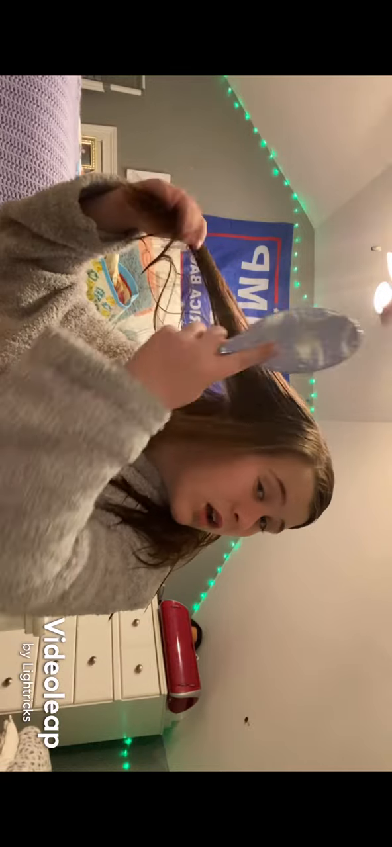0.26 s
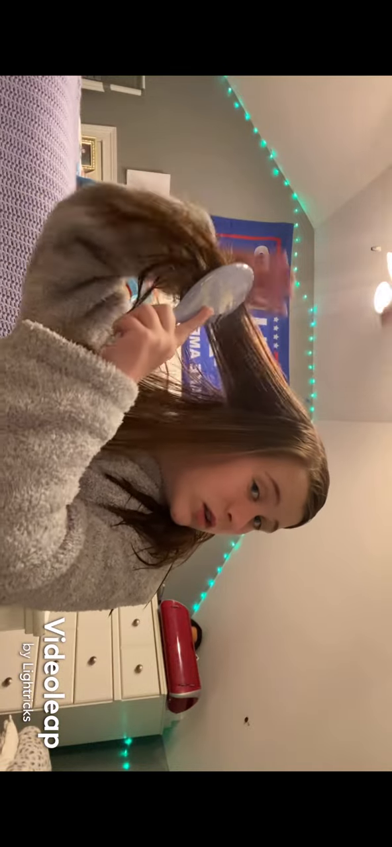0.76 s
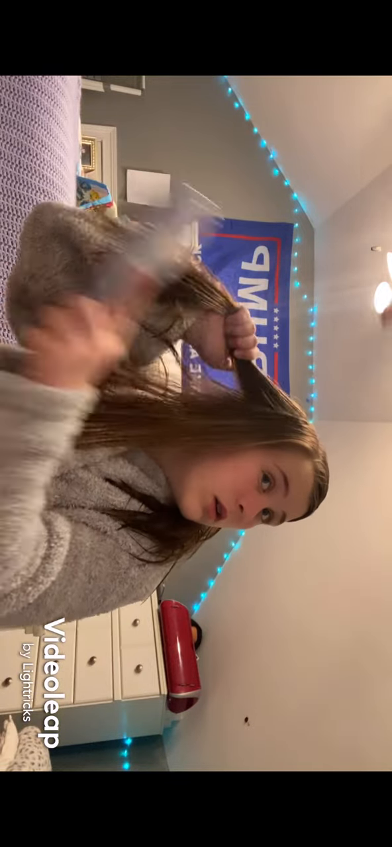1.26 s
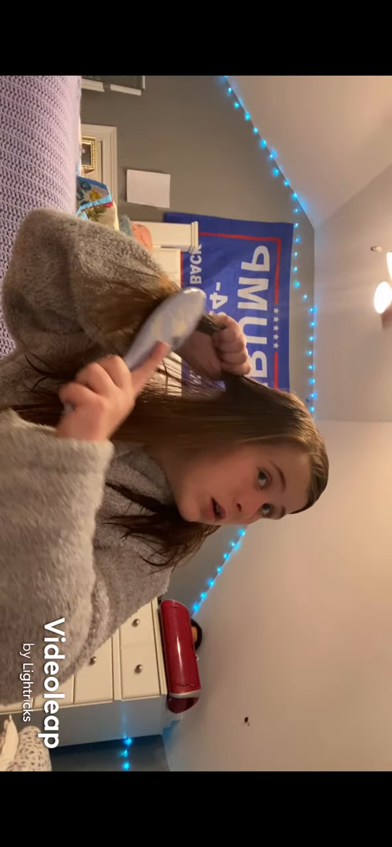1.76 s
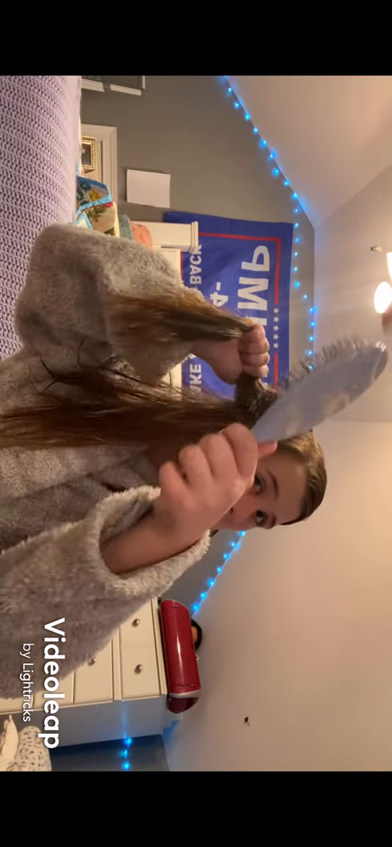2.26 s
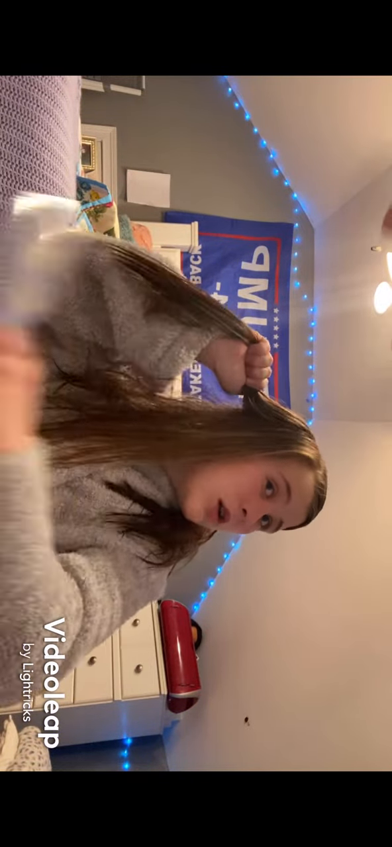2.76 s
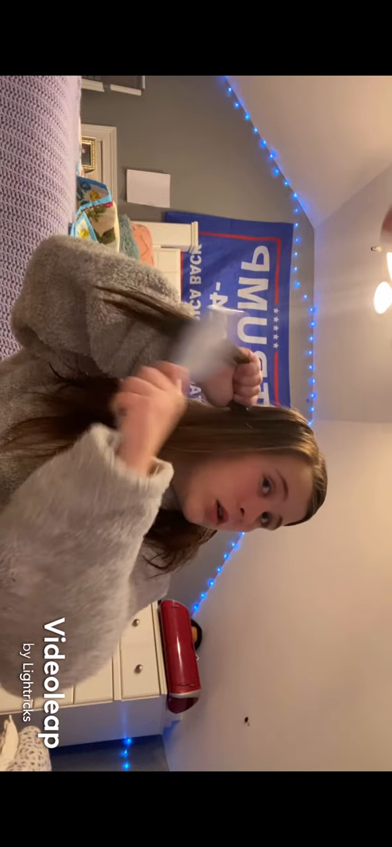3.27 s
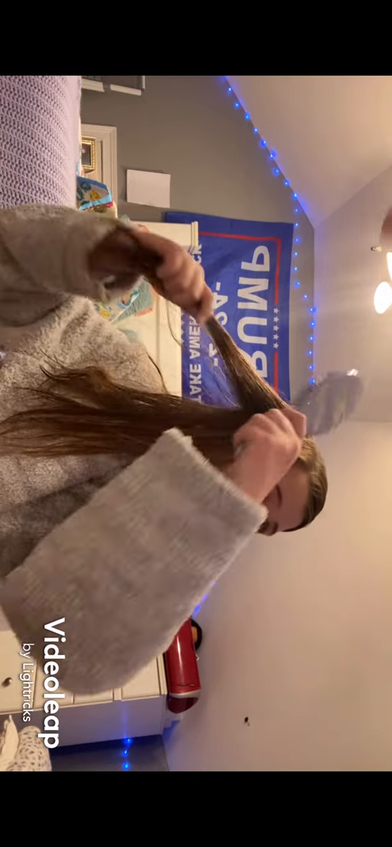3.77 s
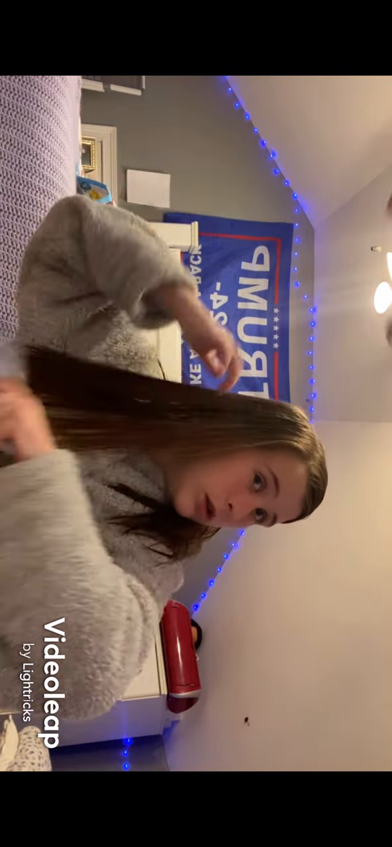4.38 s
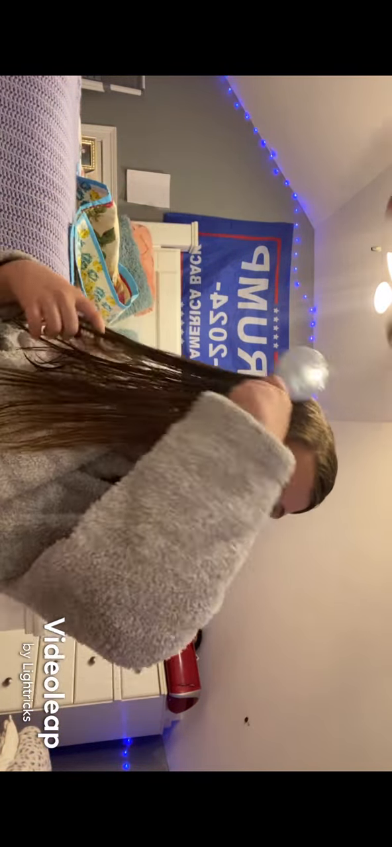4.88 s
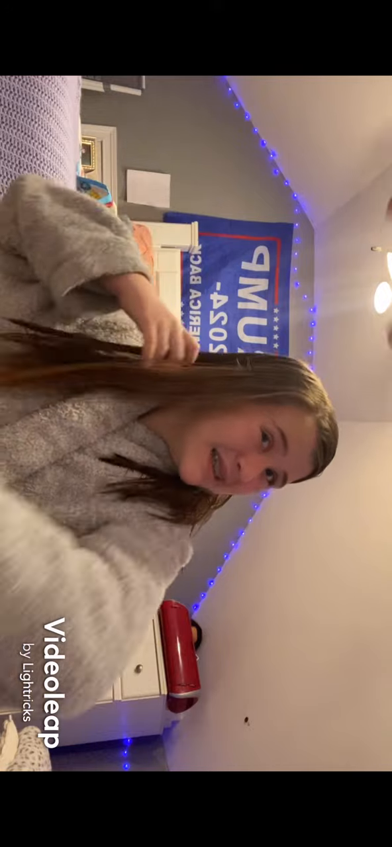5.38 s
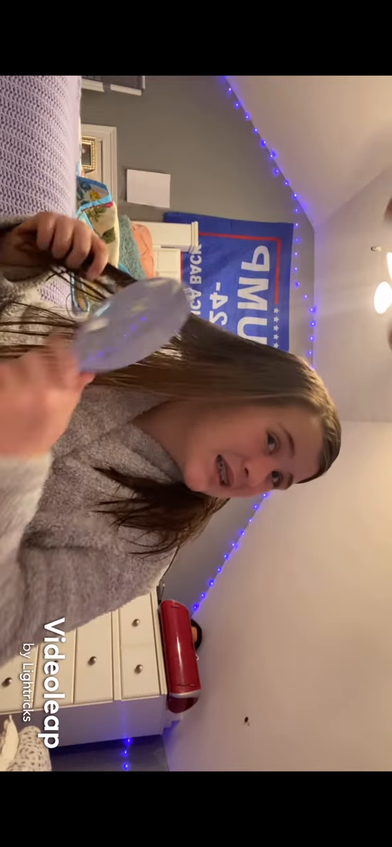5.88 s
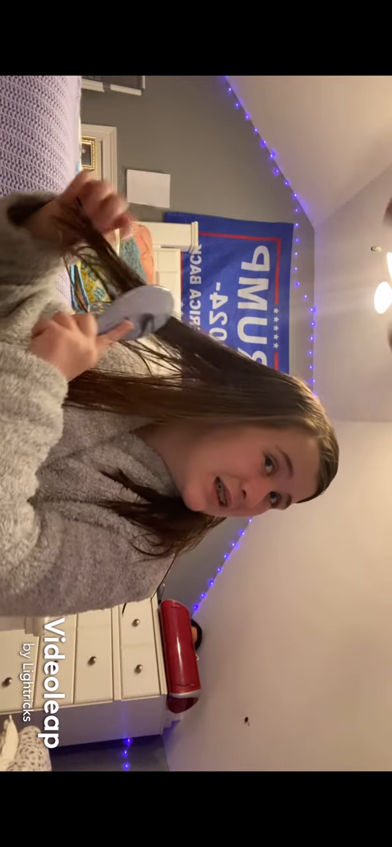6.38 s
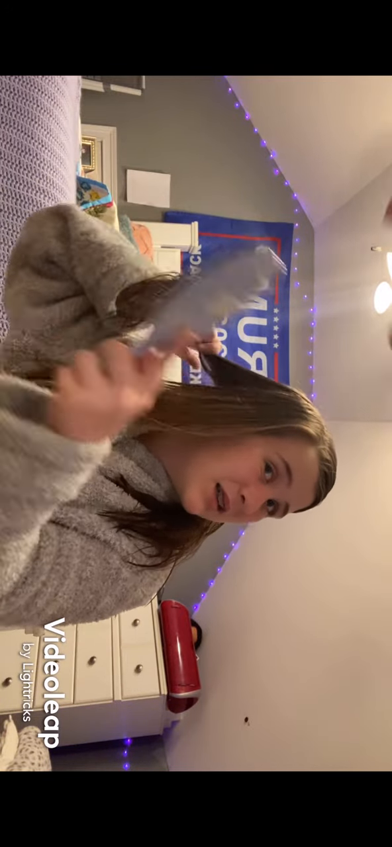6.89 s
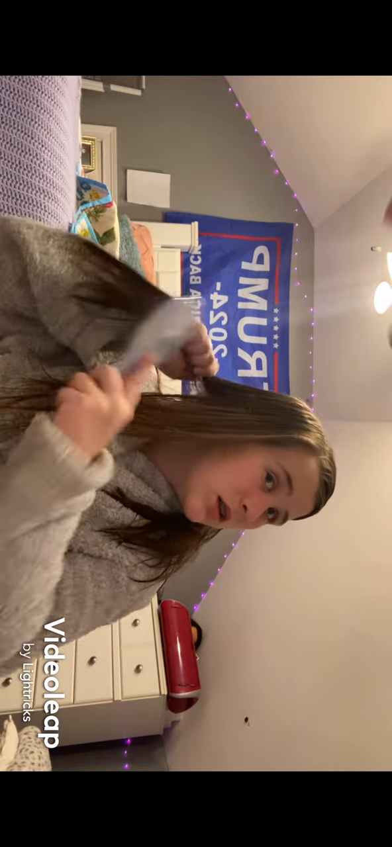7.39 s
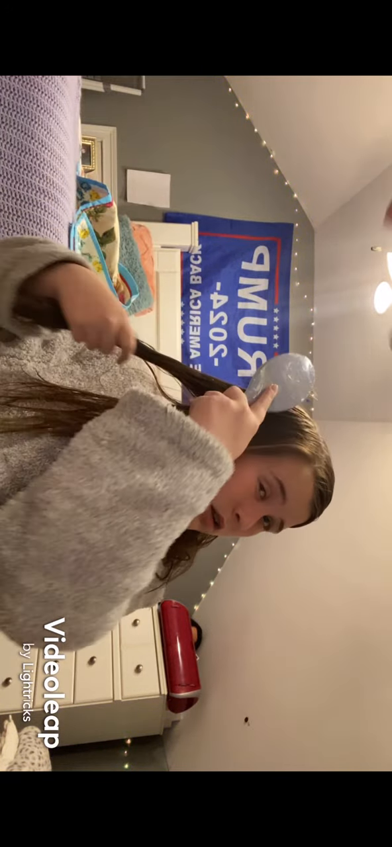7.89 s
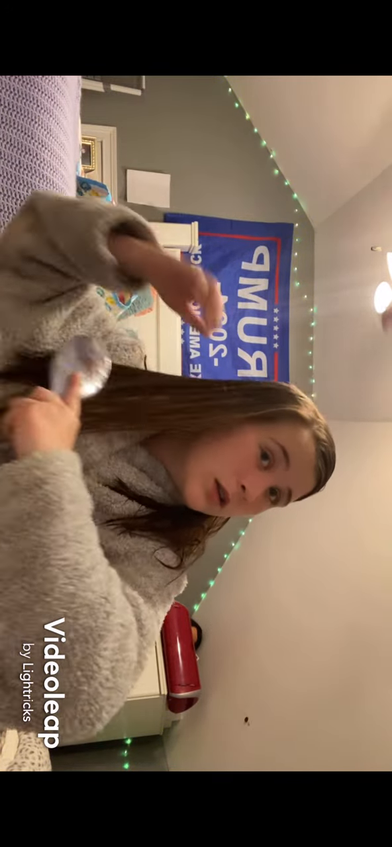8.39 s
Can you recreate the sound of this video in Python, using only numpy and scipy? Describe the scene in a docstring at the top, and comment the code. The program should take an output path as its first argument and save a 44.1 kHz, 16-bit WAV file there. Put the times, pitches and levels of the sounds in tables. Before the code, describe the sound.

Close, dry hairbrushing: brief raspy swishes, dull cushion bounces and bright little snag clicks at an irregular pace, over faint room air and rustle.

```python
"""A plastic paddle brush is pulled through long hair, close to a pair of microphone ports in a small bedroom.
Tines catch and slip in bunches, ringing the paddle and its cushion, while strands scratch and rasp past.
Soft knocks are cushion bounces that sink in pitch, with tine clatter; snags let go with pinging ticks,
and near the end a few tiny chirps squeak along a strand. Shaped noise makes the room's air and low rumble,
and tiny random creases make a faint rustle; dense, quickly dying echoes place the brush in the room."""
import sys
import numpy as np
from scipy import signal
from scipy.fft import rfft, irfft
from scipy.io import wavfile

SR = 44100
rng = np.random.default_rng(int(sys.argv[2]) if len(sys.argv) > 2 else 0)


def int16_out(signal):
    """Quantize to a 16-bit WAV file."""
    q = np.round(np.clip(np.atleast_2d(signal).T, -1, 1) * 32767)
    wavfile.write(sys.argv[1], SR, q.astype(np.int16))


N = 381024
T = np.arange(N) / SR
FREQS = np.fft.rfftfreq(N, 1 / SR)

# Levels in these tables are taken before the mix gains of their layers.
# still air of the room: (frequency [Hz], relative level [dB])
AIR_SPECTRUM = [(20, -36.5), (40, -5), (58, 7.5), (90, -9), (150, -9), (330, -19.5), (630, -29),
                (900, -25.5), (1500, -30.5), (4000, -34.5), (13500, -43), (16000, -65)]
# low rumble: (frequency [Hz], relative level [dB])
RUMBLE_SPECTRUM = [(20, -30), (42, 4), (70, 2.5), (140, -8.5), (300, -47.5)]
# swells of the rumble: (middle [s], length [s], level [dB])
RUMBLE_SWELLS = [(1.15, .25, -71), (1.43, 0.14, -58), (3.36, .3, -56.5), (4.65, 0.66, -68),
                 (5.25, 0.52, -71), (7.98, 0.57, -72.5)]
# arm movements stirring sleeve and hair: (middle [s], length [s], level [dB])
ARM_MOVES = [(0.03, 0.53, -61.5), (1.24, 0.5, -72.5), (1.68, .12, -65), (2.24, .2, -69), (2.83, 0.202, -67),
             (3.68, 0.42, -73.5), (3.98, 0.19, -61), (4.56, 0.43, -72), (5.5, 0.17, -71), (6.12, 0.49, -69),
             (6.89, 0.84, -71.5), (7.73, 0.43, -69), (8.08, 0.51, -60), (8.62, 0.23, -62)]
# hollow rustle: (frequency [Hz], relative level [dB])
RUSTLE_SPECTRUM = [(250, -12), (450, -13.5), (600, -0.5), (720, -5.5), (880, -20), (1300, -17),
                   (2000, -28.5), (13000, -45.5)]
# tines pulling through the hair: (time [s], length [s], drag on the paddle [dB], its growth from start to end [dB],
# cushion boom above drag [dB], strand scratch above drag [dB])
PULLS = [(0.344, 0.22, -66.5, 5, -9, 0.5), (0.721, .1, -67, -2, -12, -15),
         (0.872, 0.055, -62, 3, -11.5, -6.5), (0.942, 0.068, -45, 2.5, -15, -7),
         (0.983, 0.098, -40.5, 0.5, -6.5, -6), (1.319, 0.077, -52, 5, -5, -5.5),
         (1.472, 0.094, -66, 3.5, -5, -3), (1.591, 0.056, -58.5, 4, -2, -7),
         (1.734, 0.076, -44.5, -2, -7, -9), (1.869, 0.086, -55, 7.5, -6.5, -7.5),
         (1.975, 0.083, -47.5, 9, -5.5, -4.5), (2.501, 0.11, -38.5, 7, -7.5, -4.5),
         (2.911, 0.098, -36.5, 4, -5, -6.5), (3.278, 0.12, -41, -7.5, -5, -5),
         (4.047, 0.064, -55, 2.5, -9.5, -9), (4.118, 0.11, -55, 2, -9.5, -12),
         (4.22, .11, -46, 1.5, -6, -8), (4.342, 0.057, -52, -0.5, 0, -17),
         (4.426, 0.048, -48, 6.5, -3.5, -20), (4.833, 0.093, -58, 11, 0.5, -23),
         (5.049, 0.17, -51, 6, -10, -7), (5.193, 0.071, -47, -4, -7, -4),
         (5.29, 0.16, -63, -5.5, -2.5, -22), (6.295, 0.09, -57, 12.5, -9, -18),
         (6.424, 0.087, -62.5, 1, -11, -24), (6.661, 0.054, -45, 2.5, -6.5, -7.5),
         (7.027, .125, -41, 0, -5.5, -8), (7.368, 0.047, -56.5, 2.5, -2, -2.5),
         (7.402, 0.04, -41.5, 7.5, -4, -3), (7.928, 0.068, -64.5, 6.5, 9, -26),
         (8.262, 0.16, -42.5, 5, -14, -11.5), (8.395, 0.12, -44.5, 5, 0, -12)]
# brush skimming the top of the hair, swelling and fading: (middle [s], length [s], strand scratch [dB])
SKIMS = [(3.56, 0.46, -79.5), (4.05, 0.21, -61), (5.02, 0.16, -65), (6.29, 0.28, -67), (6.56, 0.43, -77),
         (7.54, 0.16, -72.5), (8.08, .24, -65), (8.23, 0.2, -68.5), (8.54, 0.094, -60)]
# ring of the paddle: (frequency [Hz], width [Hz], level [dB])
PADDLE_MODES = [(509, 130, 1), (750, 117.5, 3), (950, 310, -4.5), (1315, 224, -6.5), (1880, 170, -16),
                (2705, 330, -20.5)]
# boom of the cushion: (frequency [Hz], relative level [dB])
CUSHION_SPECTRUM = [(40, -21), (90, -12.5), (150, -3), (230, -3.5), (300, 4), (410, 5.5), (520, -1.5),
                    (800, -43.5)]
# hiss of the strands: (frequency [Hz], relative level [dB])
STRAND_SPECTRUM = [(1200, -21.5), (2100, 6.5), (3200, 2), (4300, -3), (6000, -2), (8200, 0), (10500, -8.5),
                   (13000, -1.5), (14700, -7), (16000, -32)]
# strands rubbing along loaded tines: (frequency [Hz], relative level [dB])
RASP_SPECTRUM = [(900, -9), (1500, -8.5), (1950, 8.5), (2600, -3.5), (3200, -20.5), (5000, -1.5),
                 (9000, -32.5)]
# brush landing or jerking free: (time [s], level [dB], starting cushion pitch [Hz], tine clatter above the knock [dB])
KNOCKS = [(0.725, -51, 630, 0.5), (1.066, -25.5, 1012, -15), (1.327, -30, 750, -6.5),
          (1.351, -41, 480, -22), (1.635, -39, 950, 1), (1.985, -34, 900, -3), (2.050, -40, 895, 5),
          (2.058, -41, 584, -6), (2.491, -27.5, 474, 3), (2.603, -22, 1016, -15), (2.624, -24.5, 432, -26),
          (2.902, -20, 693, -12.5), (3.013, -23, 750, -19), (3.2619, -18, 740, -2.5),
          (4.329, -27.5, 880, -10), (4.348, -28, 460, -9), (4.411, -31.5, 405, -22), (4.825, -36, 795, -29),
          (5.047, -29, 1040, -4), (5.217, -31, 700, -25), (5.261, -34.5, 450, -16), (6.363, -37, 694, -10),
          (6.473, -43.5, 700, -1.5), (7.016, -21, 955, -4.5), (7.373, -28, 820, -9),
          (7.742, -53.5, 587, -20), (7.984, -43.5, 424, -30), (8.175, -40, 750, -14),
          (8.281, -29, 785, -13.5), (8.300, -30, 660, -29), (8.452, -23, 395, -7), (8.49, -22, 500, -1)]
# many tines landing together: (frequency [Hz], relative level [dB])
CLATTER_SPECTRUM = [(500, -24.5), (1100, 16), (1550, -3.5), (2200, 7), (3800, -5), (7500, -4),
                    (13000, -6.5), (16000, -12)]
# single tines snapping off a snag: (time [s], level [dB], tine pitch [Hz], paddle tap above the tine [dB])
TICKS = [(0.886, -62, 9600, 3), (0.939, -47, 7940, 9), (0.96, -50.5, 7900, 15), (1.466, -33, 12600, -20),
         (1.508, -48.5, 12000, 2), (1.527, -48.5, 6660, 1), (1.584, -47, 12100, -1.5),
         (1.603, -43.5, 6650, 1), (1.643, -45, 6350, 5), (1.687, -53.5, 6800, 4), (1.730, -47.5, 7400, 3),
         (1.743, -47.5, 8260, 10), (1.758, -42, 6300, 6), (1.791, -38.5, 12400, -24),
         (1.889, -55.5, 7600, 7), (1.921, -43.5, 8250, 3), (2.020, -35, 8600, -6), (2.028, -32, 7950, -22),
         (2.056, -29.5, 7400, -4.5), (2.950, -26.5, 6600, 4), (2.981, -25.5, 8300, -5),
         (3.001, -30, 13200, -13), (3.377, -32, 11700, -16), (4.121, -43.5, 11900, -1.5),
         (4.163, -51, 8900, 2), (4.258, -32, 8950, 0), (4.286, -30, 14100, -14), (4.353, -42.5, 12200, -5),
         (4.461, -43, 8700, 2), (4.825, -63, 2100, 9.5), (5.096, -31, 12400, -5), (5.135, -36, 12300, -3),
         (5.412, -66.5, 2200, 15), (6.345, -45, 13300, 2), (7.062, -31.5, 7300, 4), (7.133, -34, 9700, -3),
         (7.422, -32.5, 9300, 3), (8.412, -30.5, 7800, -14)]
# crack of a freed tine: (frequency [Hz], relative level [dB])
SNAP_SPECTRUM = [(300, -26.5), (1000, -17), (1600, 10.5), (2400, 7.5), (4000, 9.5), (8500, 10.5),
                 (13500, 4), (16000, -7)]
# a tine squeaking along a taut strand: (time [s], level [dB], pitch [Hz])
SQUEAKS = [(8.4719, -22, 8360), (8.4785, -27.5, 8600), (8.4857, -37, 8500), (8.4924, -34, 8700),
           (8.5383, -34, 9200)]
# phase by which the left port leads the right: (frequency [Hz], phase [rad])
PORT_PHASE = [(30, 0), (600, .7), (1300, 1), (2300, 2.2), (5000, 3.3), (6300, 1), (8000, 0), (9200, -.9),
              (10500, -3.1), (12000, -5.7), (13700, -6.7), (15200, -9)]
# direct sound, left minus right: (frequency [Hz], level [dB])
PORT_BALANCE = [(150, 1), (350, 0.5), (700, 3.5), (2300, 1), (4400, 4.5), (8000, 0)]
# colour of the reflections, before the wet level: (frequency [Hz], level [dB])
WALLS = [(100, -16), (350, -2.5), (800, 5.5), (2000, 2), (4500, 6), (8000, -2), (14000, -12)]

# a pull grips quickly and is strongest midway; when it ends most of the drag drops and loose hair trails off
GRIP_S, ARCH_DB, SCRATCH_ARCH_DB = 0.015, 2.5, 2.5
DROP_S, TRAIL_DB, TRAIL_S, SCRATCH_TRAIL_S = 0.012, -7, 0.039, 0.033
SKIM_DRAG_DB, SKIM_BOOM_DB = -3, -6  # against the scratch
# the further a knock exceeds the load already on the cushion, the deeper its pitch sinks
SINK_OCTAVES_PER_DB, SLACK_DB, LOAD_LEAD_S = 0.0656, -79.5, 0.011
TOP_HZ = 16300


def undb(db):
    """Decibels to gain."""
    return 10 ** (np.asarray(db) / 20)


def unit(x):
    """Scale to rms 1."""
    return x / np.sqrt(np.mean(x ** 2))


def across(points):
    """Join (Hz, value) points on a log-frequency axis."""
    hz, value = np.transpose(points)
    return np.interp(np.log(FREQS + 1), np.log(hz), value)


def colour(x, points):
    """Causal, minimum-phase filter with the given (Hz, dB) shape."""
    cepstrum = irfft(np.log(undb(across(points))), N)
    fold = 1 + np.sign(N / 2 - np.arange(N)) * (T > 0)
    minimum_phase = np.exp(rfft(cepstrum * fold))
    return irfft(rfft(x) * minimum_phase, N)


def ring(x, modes):
    """Parallel resonances of alternating polarity, with the lows rolled off."""
    s = 1j * FREQS
    response = 0
    for k, (hz, width, db) in enumerate(modes):
        response = response + (-1) ** k * undb(db) * s * width / (s * s + s * width + hz * hz)
    low_cut = s / (s + modes[0][0] / 2)
    return irfft(rfft(x) * response * low_cut, N)


def struck(blows):
    """The paddle's answer to blows, scaled so that a lone unit blow peaks at 1."""
    lone_blow = 1. * (T == 0)
    return ring(blows, PADDLE_MODES) / np.abs(ring(lone_blow, PADDLE_MODES)).max()


def walk(rate):
    """Smooth random wander of rms 1 that changes about rate times a second."""
    smoothing = 1 + (FREQS / rate) ** 4
    return unit(irfft(rfft(rng.standard_normal(N)) / smoothing, N))


def add(track, start, sound):
    """Mix a short sound in at a time."""
    i = int(max(start, 0) * SR)
    track[i:i + len(sound)] += sound[:N - i]


def slips(per_second, spread_db):
    """Tiny stick-slip releases at random moments, a few much larger than the rest, with equal power at any rate."""
    happens = rng.random(N) < per_second / SR
    size = undb(spread_db * np.minimum(rng.exponential(size=N), 3))
    polarity = rng.choice([-1, 1], N)
    return unit(happens * size * polarity / np.sqrt(per_second))


def swells(rows):
    """Sum of smooth rises and falls, each about 14 dB down at the ends of its length."""
    return sum(undb(db) * np.exp(-np.pi * 2 * ((T - middle) / length) ** 2) for middle, length, db in rows)


def air():
    """Still room: a swelling low rumble common to both ports and a thin, wide hiss."""
    mid = colour(rng.standard_normal(N), AIR_SPECTRUM) * undb(0.5 * walk(rate=4.5))
    side = colour(rng.standard_normal(N), AIR_SPECTRUM)
    side = colour(side, [(60, -6.5), (200, 0), (1000, -1)])
    rumble = swells(RUMBLE_SWELLS) * unit(colour(rng.standard_normal(N), RUMBLE_SPECTRUM))
    return undb(-69) * unit(mid + np.outer([1, -1], side)) + rumble


def rustle(waver_db=3.0, rest_db=-87):
    """Tiny creases make a soft, hollow, wavering rustle that swells with each arm movement."""
    creases = slips(per_second=900, spread_db=3.0)
    level = (swells(ARM_MOVES) + undb(rest_db)) * undb(waver_db * walk(rate=12))
    return level * unit(colour(creases, RUSTLE_SPECTRUM))


def effort():
    """Drag on the paddle, boom of the cushion and scratch of the strands through all pulls and skims."""
    drag, boom, scratch = np.outer(undb([SKIM_DRAG_DB, SKIM_BOOM_DB, 0]), swells(SKIMS))
    t = T[:SR]
    for start, length, db, growth_db, boom_db, scratch_db in PULLS:
        along = np.minimum(t / length, 1)
        after = np.maximum(t - length, 0)
        arch = np.sin(np.pi * along) - 2 / np.pi  # averages zero over the pull
        grip = np.minimum(t / GRIP_S, 1)
        held = grip * undb(db + growth_db * (along - .5) + ARCH_DB * arch)
        drop = (1 - undb(TRAIL_DB)) * np.exp(-after / DROP_S)
        pull = held * (drop + undb(TRAIL_DB) * np.exp(-after / TRAIL_S))
        hiss = held * (drop + undb(TRAIL_DB) * np.exp(-after / SCRATCH_TRAIL_S))
        add(drag, start, pull)
        add(boom, start, pull * undb(boom_db))
        add(scratch, start, hiss * undb(scratch_db + SCRATCH_ARCH_DB * arch))
    return drag, boom, scratch


def brushing(drag, boom, scratch, rasp_share=0.24):
    """Tines slip through the hair in bunches, shaking paddle and cushion; the strands rasp and hiss over them."""
    # a slow pull crackles tine by tine and in bunches, a fast one runs evenly together
    speed = np.sqrt(drag / drag.max())
    bunches = walk(rate=230)
    tines = slips(per_second=200 + 2600 * speed, spread_db=3.5) * undb((2.0 - 0.87 * speed) * bunches)
    fibres = slips(per_second=14000, spread_db=7.0) * undb(3.1 * bunches)
    paddle = unit(ring(tines, PADDLE_MODES))
    cushion = unit(colour(tines, CUSHION_SPECTRUM))
    # a light stroke mostly lets the strands hiss; under load the tines click along
    clicks = undb(-11.5) * np.sqrt(speed) * tines
    strands = unit(colour(fibres + clicks, STRAND_SPECTRUM))
    # the rasp needs both pressure on the tines and strands running past them
    rasp_level = drag ** rasp_share * scratch ** (1 - rasp_share)
    rasp = rasp_level * unit(colour(tines + undb(-4.5) * fibres, RASP_SPECTRUM))
    shaken = undb(-1.1) * drag * paddle + undb(2.5) * boom * cushion
    return shaken + undb(-2.86) * scratch * strands + undb(-14) * rasp


def knocks(drag, decay_s=0.0029, rise_s=0.0011, sink_s=0.0096, thud=0.06, thud_hz=120, thud_s=0.0064,
           clatter_s=0.00074, rap_db=-14, press_s=0.025, press_rise_s=0.0049, press_db=-22):
    """Tines clatter down and rap the paddle; the cushion bounces a few cycles, sinking in pitch as it yields."""
    body, clatter, rap = np.zeros((3, N))
    t = T[:SR // 20]
    for start, db, hz, clatter_db in KNOCKS:
        load = np.interp(start - LOAD_LEAD_S, T, drag) + undb(SLACK_DB)
        octaves = SINK_OCTAVES_PER_DB * (db - 20 * np.log10(load))
        pitch = hz * 2 ** (-octaves * np.tanh(t / sink_s))
        rise = 1 - np.exp(-t / rise_s)
        swell = rise ** 2 * np.exp(-t / decay_s)
        bounce = swell / swell.max() * np.sin(2 * np.pi * np.cumsum(pitch) / SR)
        # the deeper the cushion sinks, the more the head thuds behind it
        head = octaves * thud * rise * np.exp(-t / thud_s) * np.sin(2 * np.pi * thud_hz * t)
        add(body, start, undb(db) * (bounce + head))
        add(rap, start, undb([db]))
        # the hair is pressed against the paddle in a short noisy swell that peaks with the blow and fades
        # around it
        press = np.exp(-np.abs(t - press_s) / press_rise_s)
        add(rap, start - press_s, undb(db + press_db) * rng.standard_normal(len(t)) * press)
        # the outermost tines begin to graze the hair a few milliseconds before the rest land
        lead_s = 0.0048
        graze = undb(-26.0) * np.exp(-np.abs(t - lead_s) / 0.0065)
        landing = np.exp(-np.abs(t - lead_s - clatter_s) / clatter_s) + graze
        add(clatter, start - lead_s, undb(db + clatter_db) * rng.standard_normal(len(t)) * landing)
    return undb(-2.5) * body + undb(-2) * colour(clatter, CLATTER_SPECTRUM) + undb(rap_db) * struck(rap)


def ticks(ring_s=0.00085, crack_s=0.00017, crack_db=-5, chatter_db=-18, chatter_s=0.0035):
    """A bent tine cracks free, pings at its own pitch, chatters against its neighbours and taps the paddle."""
    ping, crack, tap = np.zeros((3, N))
    t = T[:SR // 20]
    for start, db, hz, paddle_db in TICKS:
        shape = np.exp(-t / crack_s) + undb(chatter_db) * np.exp(-t / chatter_s)
        add(crack, start, undb(db) * shape * rng.standard_normal(len(t)))
        add(ping, start, undb(db) * np.exp(-t / ring_s) * np.sin(2 * np.pi * hz * t))
        add(tap, start, undb([db + paddle_db]))
    return undb(-4.5) * ping + undb(crack_db) * colour(crack, SNAP_SPECTRUM) + undb(3.0) * struck(tap)


def squeaks(rise_s=0.00027, decay_s=0.00068, grit_db=-13):
    """A tine sticks and slips on a taut strand: each slip is a tiny, gritty chirp."""
    out = np.zeros(N)
    t = T[:SR // 50]
    since = t - t.mean()
    shape = np.exp(-np.abs(since) / np.where(since < 0, rise_s, decay_s))
    for middle, db, hz in SQUEAKS:
        tone = np.sin(2 * np.pi * hz * t)
        grit = undb(grit_db) * rng.standard_normal(len(t))
        add(out, middle - t.mean(), undb(db) * shape * (tone + grit))
    return out


def bedroom(x, wet_db, drift_hz, early_s=0.0057, late_db=-13, t60=0.2, first_s=.002):
    """Direct sound reaches two ports; close surfaces answer at once, the soft room dies quickly."""
    turn = np.exp(.5j * across(PORT_PHASE))
    wet = undb(across(WALLS) + wet_db)
    balance = undb(np.outer([.5, -.5], across(PORT_BALANCE)))
    heard = rfft(x) * balance / np.sqrt(1 + wet ** 2)  # direct and reflected power share one budget
    late = undb(late_db) * np.exp(-np.log(1000) * T / t60)
    decay = (T > first_s) * (np.exp(-T / early_s) + late)
    out = irfft(heard * np.array([turn, 1 / turn]), N)
    # each spot of brush and hair has its own pattern of reflections, and the sounding spot keeps shifting
    spots = np.array([walk(drift_hz) for _ in range(4)])
    for share in spots / np.sqrt(np.sum(spots ** 2, axis=0)):
        echoes = rfft(rng.standard_normal((2, N)) * decay / np.sqrt(np.sum(decay ** 2)))
        out = out + share * irfft(heard * wet * echoes, N)
    return out


def scene():
    """Spread-out brushing and rustle, with more direct knocks, ticks and squeaks, over the room's still air."""
    drag, boom, scratch = effort()
    strokes = undb(0.6) * brushing(drag, boom, scratch)
    swishes = bedroom(strokes + rustle(), wet_db=-1.5, drift_hz=23.2)
    blows = bedroom(knocks(drag) + ticks() + squeaks(), wet_db=-4.0, drift_hz=4.6)
    return swishes + blows + air()


def record(dry):
    """A steep low-pass cuts the extreme top."""
    return signal.sosfilt(signal.ellip(8, .2, 70, TOP_HZ, fs=SR, output="sos"), dry)


dry = scene()
out = record(dry)
int16_out(out)
```